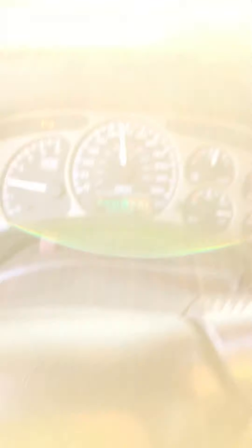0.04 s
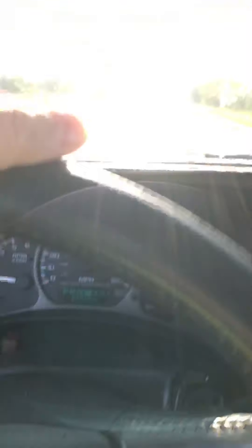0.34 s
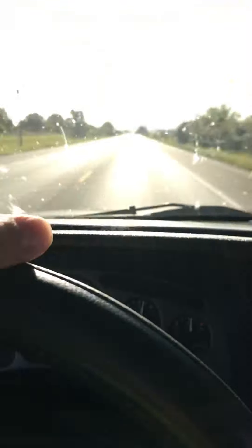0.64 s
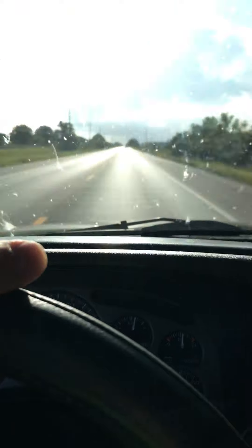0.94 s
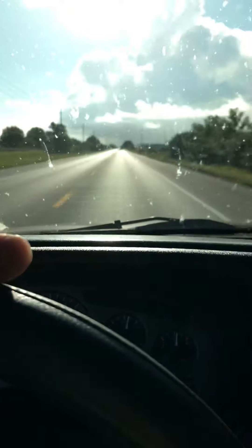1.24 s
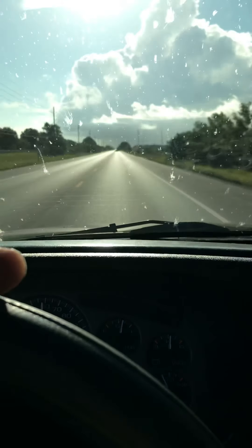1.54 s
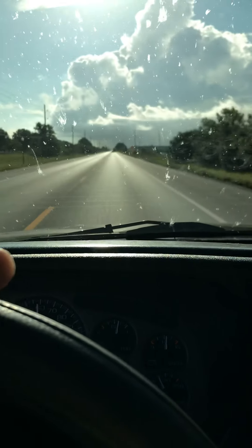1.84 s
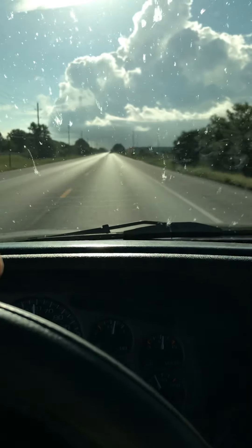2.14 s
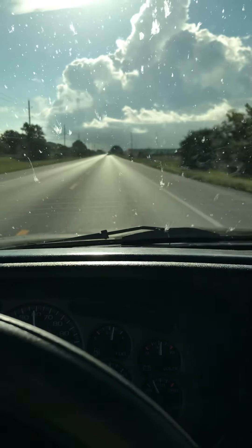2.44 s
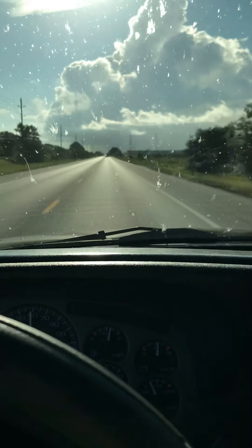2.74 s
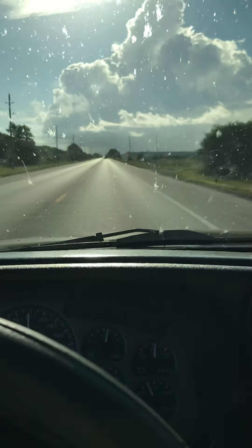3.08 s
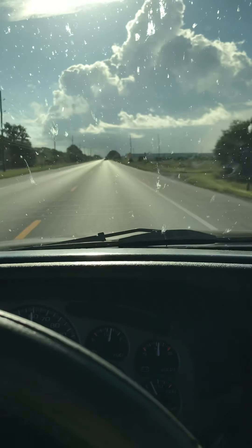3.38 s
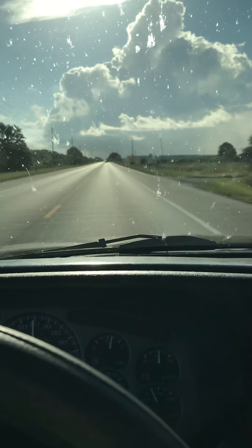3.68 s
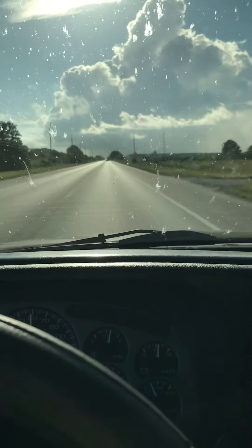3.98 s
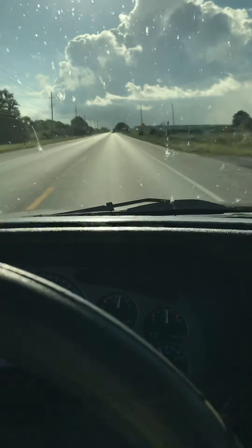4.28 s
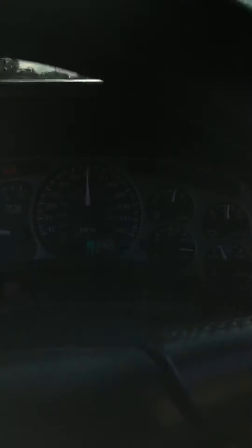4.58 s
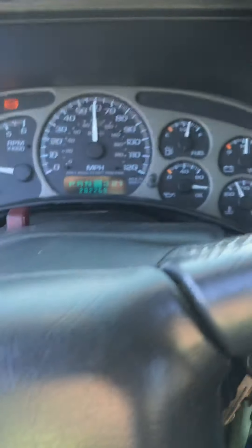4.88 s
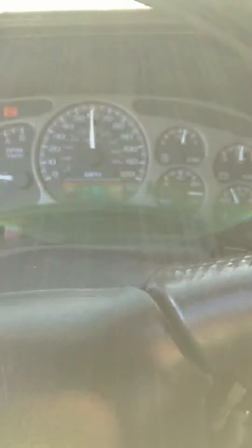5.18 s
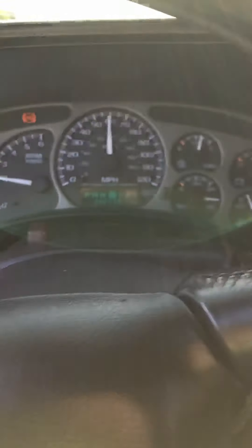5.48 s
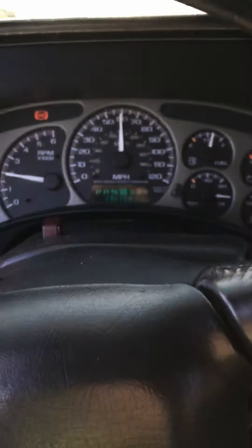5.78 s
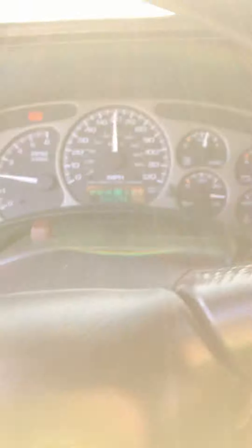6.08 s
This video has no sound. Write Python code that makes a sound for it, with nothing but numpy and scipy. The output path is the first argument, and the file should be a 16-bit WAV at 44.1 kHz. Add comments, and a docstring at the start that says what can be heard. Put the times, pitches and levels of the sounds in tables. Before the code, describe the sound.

Inside a moving pickup, a V8 rumbles with light clatter under load, then settles to a smoother drone above road noise.

```python
"""In the driver's seat of a V8 pickup, as it pulls up to highway speed and eases into a cruise.
Uneven firing makes the exhaust beat and boom at multiples of the engine's cycle rate; valves clatter,
panels sing and one cylinder knocks under load. Tyres rumble below and air hisses round the cab.
The microphone is lifted over the wheel, then sinks back into the footwell's roar and the cab's
standing waves with a brush of sleeve. The trim ticks twice."""
import sys
import numpy as np
from scipy import signal
from scipy.fft import rfft, irfft, next_fast_len
from scipy.io import wavfile

SR = 44100
rng = np.random.default_rng(int(sys.argv[2]) if len(sys.argv) > 2 else 0)


def waveform_to_disk(signal):
    """Save audio, clipped to [-1, 1], as 16-bit WAV at the path in sys.argv[1]."""
    frames = np.transpose(np.atleast_2d(signal))
    scaled = np.clip(frames, -1, 1) * 32767
    samples = np.round(scaled).astype(np.int16)
    wavfile.write(sys.argv[1], SR, samples)


N = 274302
TIME = np.arange(N) / SR

# Exhaust harmonics. Each row: multiple of the cycle rate, relative dB pulling, relative dB cruising.
EXHAUST_HARMONICS = [(3, -36.5, -62), (4, -44, -73), (5, -20, -15), (6, -26, -27), (7, -34, -53.5),
                     (8, -15, -17.5), (9, -22, -23.5), (10, -27, -34.5), (11, -32.5, -38), (12, -39, -56),
                     (13, -38.5, -45), (14, -57.5, -45.5), (15, -51, -56), (16, -57.5, -50.5),
                     (17, -48.5, -41.5), (18, -38.5, -41), (19, -46.5, -44), (20, -49.5, -50.5),
                     (21, -41.5, -52.5), (22, -43.5, -40.5), (23, -53.5, -59), (24, -52, -73.5),
                     (25, -73, -77.5), (26, -56, -53.5), (27, -78.5, -60.5)]
# Gas puffs. Each row: place in the cycle from 0 to 1, width in cycles, relative strength.
GAS_PUFFS = [(.045, .03, .8), (.18, .035, .4), (.3, .035, .15)]
# Modes of the knocked manifold. Each row: frequency in Hz, relative level in dB, seconds to fall 60 dB.
MANIFOLD_MODES = [(1210, -6, .026), (1420, -7, .018), (1610, 0, .026), (1790, -7, .02), (2420, -12, .03)]
# Upper harmonics that sing in the cab. Each row: multiple of the cycle rate, relative level in dB.
WHINE_HARMONICS = [(35, -10), (41, -5), (44, -6), (46, 2), (57, -7), (62, -6), (73, -6), (93, -9)]
# Resonances and hollows. Each row: centre in Hz, width in Hz, gain in dB.
STANDING_WAVES = [(250, 31, 4.5), (328, 19, 10)]  # down by the steering column
PANEL_RESONANCES = [(458, 12, 8.5), (500, 8.1, 3), (480, 58, 0), (580, 24, 5.5), (660, 50, -11),
                    (650, 8.9, 2), (698, 24, 7.5), (760, 54, 8.5), (880, 56, -5), (907, 87, 12),
                    (982, 45, 6.5), (1194, 31, 7.5), (1493, 80, 8)]  # rung by the engine
CAB_ABSORPTION = [(520, 150, -5.5), (850, 90, -6.5), (1600, 310, -2.5)]  # bands of rasp that the cab swallows
# Noise spectra. Each row: frequency in Hz, relative spectral density in dB.
CLATTER_SPECTRUM = [(250, -27), (420, -6.5), (600, 0), (840, -7.5), (1000, -7), (1250, 0), (1600, -2),
                    (2100, -8), (2450, -9.5), (3200, -15), (4500, -24), (8000, -38.5)]
TYRE_SPECTRUM = [(12, -22), (22, -17.5), (32, 2), (46, 4), (65, -0.5), (110, -11), (150, -3), (200, -9),
                 (235, -16.5), (300, -11.5), (400, -24.5), (800, -27), (1600, -33), (4000, -58)]
FOOTWELL_SPECTRUM = [(150, -9.5), (300, 4.5), (480, 0), (700, -1.5), (1000, 2), (1500, -16.5), (2150, -7.5),
                     (3000, -25), (7500, -33), (9500, -26), (11000, -37.5)]
AIR_SPECTRUM = [(600, -9), (2000, 8), (3200, 9), (4500, 8), (4900, 1.5), (5400, 6.5), (6800, 3.5),
                (7600, -1.5), (8600, 1.5), (9900, .5), (10400, -8), (11400, -4), (15500, -7)]
SLEEVE_SPECTRUM = [(1500, -18), (2800, 1.5), (4200, 0), (6000, -10), (14000, -19)]
# Ticks of cab trim. Each row: start in seconds, relative level in dB.
TRIM_TICKS = [(1.7794, -47), (3.1894, -59.5)]
# Microphone moves. Each row: midpoint in seconds, length in seconds, change in lowness.
MICROPHONE_MOVES = [(0.405, 0.77, -.92), (4.47, 0.61, 1)]

# Layer gains. Each holds: dB at no load, dB added at full load, dB added with the microphone low.
BOOM_DB, CLATTER_DB, KNOCK_DB = (-2, 0, 1.5), (-45, 5.5, -1.94), (-30.5, 8, -11)
WHINE_DB, AIR_DB = (-54, -3, -5), (-59, 4, 0.4)


def exhaust(cycles, speed, load, low, boom_lead_cycles=0.1514):
    """Harmonic series: the banks fire unevenly, so multiples of the cycle rate sound, odd and even."""
    orders, pulling_db, cruising_db = np.transpose(EXHAUST_HARMONICS)
    orders = orders.astype(int)
    phases = pipe_phase(orders, pulling_db)
    lag = .935 + 0.031 * (1 - load)  # in cycles; cooler gas carries the beat more slowly
    beat, boom = np.zeros((2, N))
    for order, pull, cruise, phase in zip(orders, pulling_db, cruising_db, phases):
        amplitude = np.sqrt(2) * from_db(cruise + load * (pull - cruise))
        # the firing hum, eight to a cycle, comes straight from the block and keeps its timing
        delayed = cycles - (lag[0] if order == 8 else lag)
        if order <= 12:
            beat += amplitude * np.cos(2 * np.pi * order * delayed + phase)
        else:
            amplitude *= standing_wave_gain(order * speed, low)
            boom += amplitude * np.cos(2 * np.pi * order * (delayed + boom_lead_cycles) + phase)
    beat *= 1 + 0.025 * wander(27)  # no two firings are equally strong
    boom *= 1 + 0.1 * wander(32)
    return beat + layer_gain(BOOM_DB, load, low) * boom


def pipe_phase(orders, gains_db, floor_db=-50):
    """Minimum phase: in a causal pipe with these gains, each thump starts sharply and rings out."""
    log_gain = np.log(from_db(np.interp(np.arange(65), orders, gains_db, floor_db, floor_db)))
    mirrored = np.r_[log_gain, log_gain[-2:0:-1]]
    return -signal.hilbert(mirrored).imag[orders]


def standing_wave_gain(hz, low):
    """Standing waves: harmonics near a cab mode grow as the microphone sinks."""
    return from_db(low * resonance_db(hz, STANDING_WAVES))


def clatter(cycles, load, low, rasp_db=-1.5):
    """Amplitude modulation: puffs pulse a repeating valve and gas rattle and, more gently, fresh rasp."""
    place = cycles % 1
    pattern = rng.standard_normal(2048)
    repeated = unit_rms(np.interp(place, np.arange(len(pattern)) / len(pattern), pattern))
    puffs = sum(strength * np.exp(-(((place - at + .5) % 1 - .5) / width) ** 2)
                for at, width, strength in GAS_PUFFS)
    pulsed = repeated * (1 + puffs * (0.55 + 0.62 * load))  # load sharpens the puffs
    rattle = colour(pulsed, CLATTER_SPECTRUM, PANEL_RESONANCES + [(2960, 2300, -6)])
    rasp = colour(rng.standard_normal(N) * (1 + 0.18 * puffs), CLATTER_SPECTRUM, CAB_ABSORPTION)
    return layer_gain(CLATTER_DB, load, low) * unit_rms(rattle + from_db(rasp_db) * rasp)


def knock(cycles, speed, load, low, at_cycle=0.0059, rise_s=0.005):
    """Damped modes: one cylinder's pulse rings the manifold once a cycle, harder under load."""
    since_s = (cycles - at_cycle) % 1 / speed
    ring = sum(from_db(db - 60 * since_s / t60) * np.sin(2 * np.pi * (hz * since_s + rng.random()))
               for hz, db, t60 in MANIFOLD_MODES)
    attack = 1 - np.exp(-(since_s / rise_s) ** 2)
    uneven = from_db(2.2 * wander(8))
    gain = layer_gain(KNOCK_DB, load, low)  # the dashboard screens a low microphone
    return gain * uneven * attack * ring


def whine(cycles, load, low):
    """Forced vibration: high harmonics meet panel resonances, each swelling and wavering on its own."""
    tones = sum(from_db(db + 2 * wander(11)) * np.cos(2 * np.pi * order * cycles + wander(14))
                for order, db in WHINE_HARMONICS)
    return layer_gain(WHINE_DB, load, low) * np.sqrt(2) * tones


def tyres():
    """Structure-borne sound: tyre rumble crosses the floor, swelling with the road surface."""
    return from_db(-31 + 2 * wander(1.8)) * noise(TYRE_SPECTRUM)


def footwell(load, low):
    """Proximity: road and engine roar from under the dashboard is heard when the microphone is low."""
    return from_db(-45.5 + 4 * load) * low * noise(FOOTWELL_SPECTRUM)


def air(load, low):
    """Flow noise: air hisses round the cab, fluttering a little."""
    flutter = from_db(.5 * wander(22))
    return layer_gain(AIR_DB, load, low) * flutter * noise(AIR_SPECTRUM)


def trim(decay_s=.002):
    """Damped transients: the cab trim gives tiny dry ticks that die away exponentially."""
    bursts = sum(from_db(db) * (TIME >= start) * np.exp(-abs(TIME - start) / decay_s)
                 for start, db in TRIM_TICKS)
    return from_db(-8) * bursts * noise([(2000, -22), (7000, -2), (14000, -3.5)])


def sleeve(at_s=4.43, half_width_s=0.083):
    """Friction noise: a sleeve brushes past as the microphone is lowered."""
    swell = np.exp(-((TIME - at_s) / half_width_s) ** 2)
    return from_db(-56.5 + 2.5 * wander(50)) * swell * noise(SLEEVE_SPECTRUM)


def drive(hold_s=.4503, ease_s=3.1037, start_hz=15.4273, pull_hz_per_s=.425, drag_hz_per_s=.0951):
    """Force balance: an easing throttle pulls against drag; gives cycles per second and load (0-1)."""
    throttle = np.exp(-np.maximum(TIME - hold_s, 0) / ease_s)
    speed = start_hz + np.cumsum(pull_hz_per_s * throttle - drag_hz_per_s) / SR
    load = 1 / (1 + (0.66 / throttle) ** 5.7)  # the engine labours past two-thirds throttle
    return speed, load


def lowness(initial=0.92):
    """Harmonic motion: the microphone moves in half-cosines between high (0) and low (1)."""
    moved = sum(change * (1 + np.sin(np.pi * np.clip((TIME - middle) / length, -.5, .5))) / 2
                for middle, length, change in MICROPHONE_MOVES)
    return np.clip(initial + moved, 0, 1)


def layer_gain(gains_db, load, low):
    """Gains add in decibels: a base, a share for engine load and a share for microphone height."""
    base_db, load_db, low_db = gains_db
    return from_db(base_db + load_db * load + low_db * low)


def resonance_db(hz, peaks):
    """Resonance: each peak or hollow is a Lorentzian curve in decibels."""
    return sum(db / (1 + (2 * (hz - centre) / width) ** 2) for centre, width, db in peaks)


def colour(x, spectrum, peaks=()):
    """Linear filtering: shapes x by a spectrum with resonances on top, at rms 1."""
    size = next_fast_len(N)
    hz = np.arange(size // 2 + 1) * SR / size
    points_hz, points_db = np.transpose(spectrum)
    db = np.interp(np.log(hz + 1), np.log(points_hz), points_db) + resonance_db(hz, peaks)
    return unit_rms(irfft(rfft(x, size) * from_db(db), size)[:N])


def noise(spectrum):
    """Filtered white noise of rms 1."""
    return colour(rng.standard_normal(N), spectrum)


def wander(rate_hz):
    """Random fluctuation of rms 1, mostly slower than rate_hz."""
    return noise([(rate_hz / 2, 0), (rate_hz, -3), (rate_hz * 10, -60), (rate_hz * 100, -140)])


def from_db(db):
    """Decibels to amplitude ratio."""
    return 10 ** (np.asarray(db) / 20)


def unit_rms(x):
    """Normalisation to rms 1."""
    return x / np.sqrt(np.mean(x ** 2) + 1e-20)


def scene():
    """Superposition: engine, road, air and small cab sounds add at one microphone."""
    speed, load = drive()
    cycles = np.cumsum(speed) / SR  # one cycle is two turns of the crank and eight firings
    low = lowness()
    engine = exhaust(cycles, speed, load, low) + clatter(cycles, load, low)
    engine += knock(cycles, speed, load, low) + whine(cycles, load, low)
    return (engine + tyres() + footwell(load, low) + air(load, low) + trim() + sleeve())[None]


def record(dry, cutoff_hz=15750):
    """Band limiting: a steep low-pass filter removes the highest treble."""
    low_pass = signal.firwin(511, cutoff_hz, window=("kaiser", 9), fs=SR)
    return signal.oaconvolve(dry, low_pass[None], "same")


dry = scene()
out = record(dry)
waveform_to_disk(out)
```